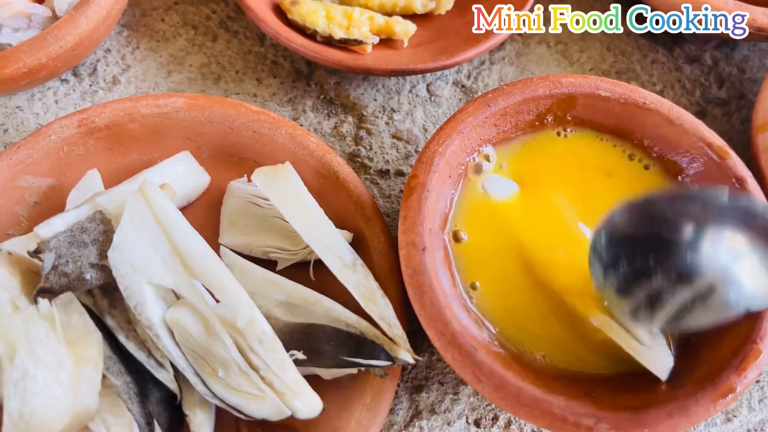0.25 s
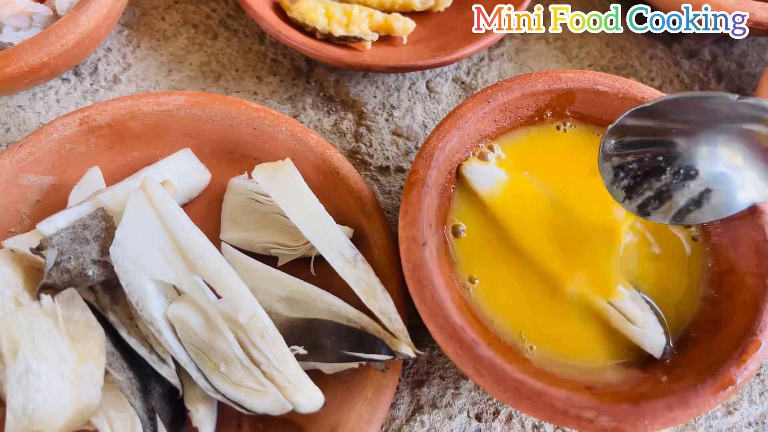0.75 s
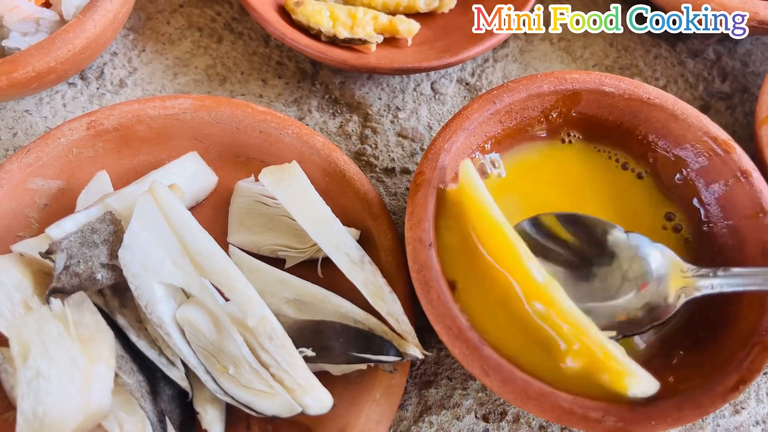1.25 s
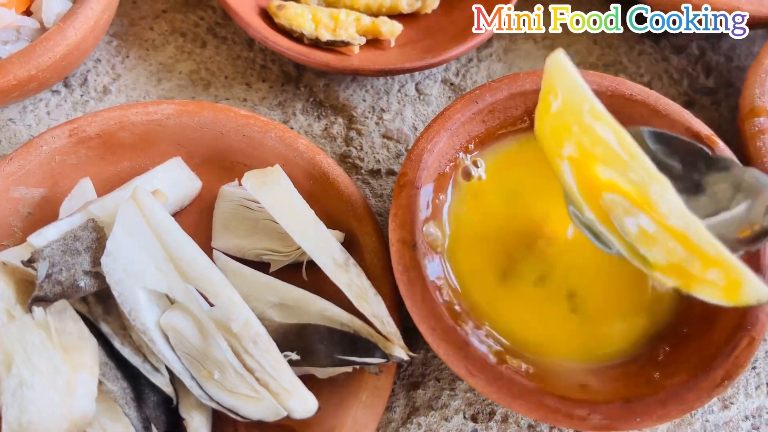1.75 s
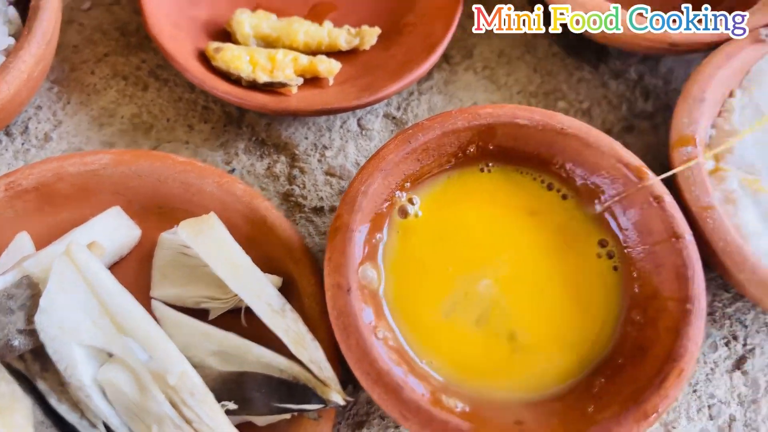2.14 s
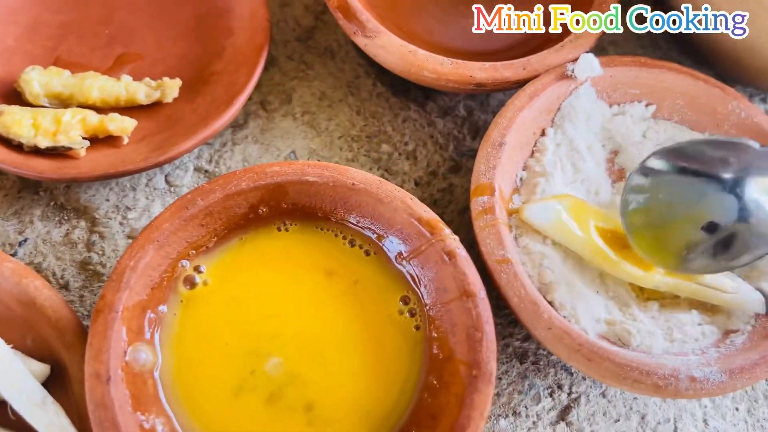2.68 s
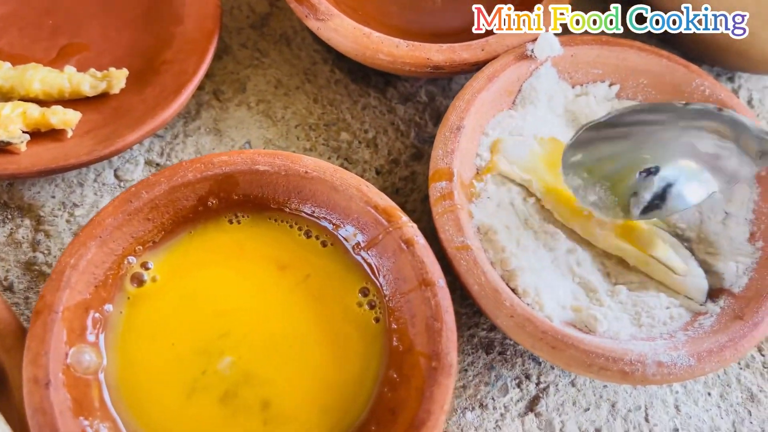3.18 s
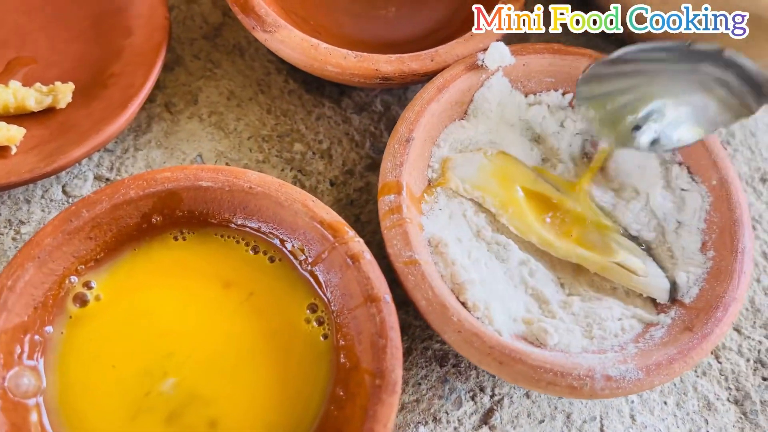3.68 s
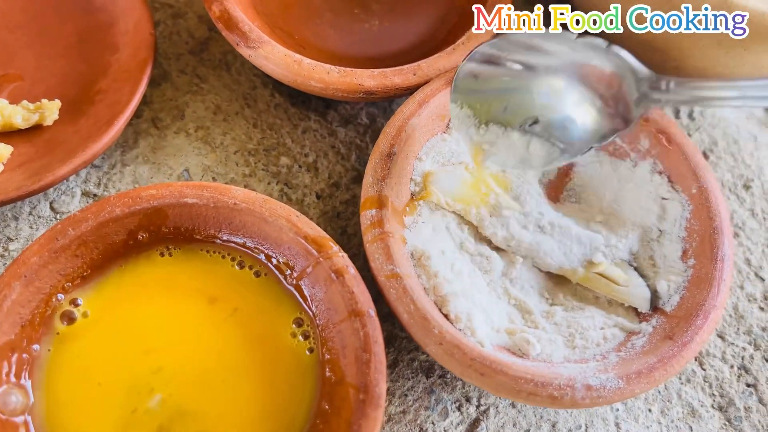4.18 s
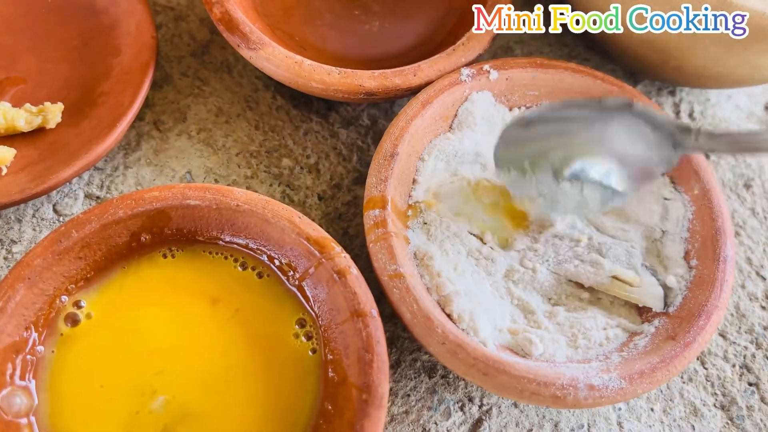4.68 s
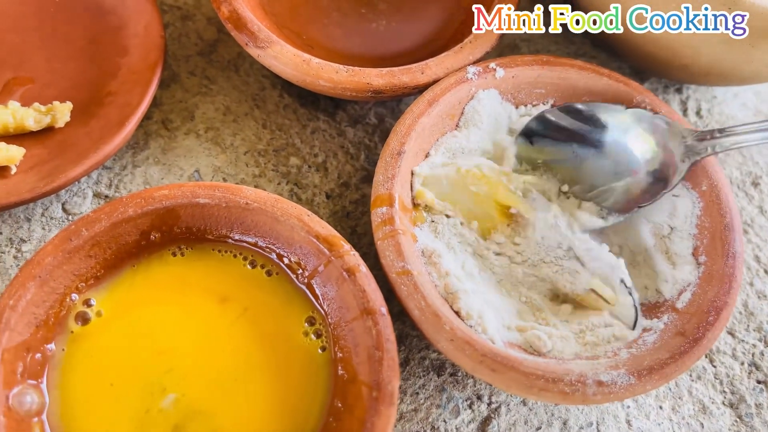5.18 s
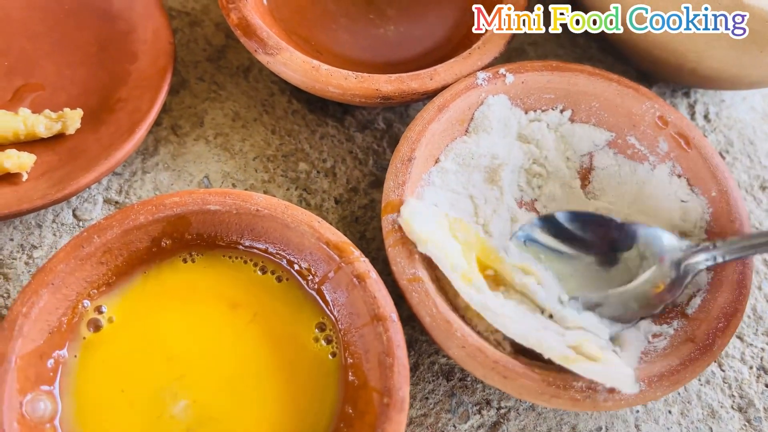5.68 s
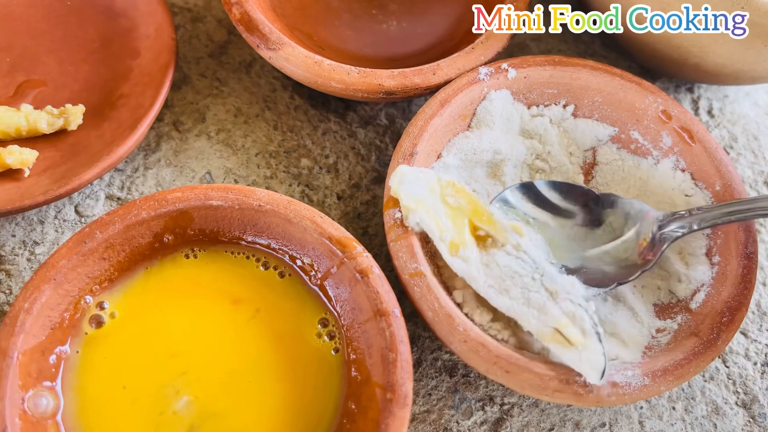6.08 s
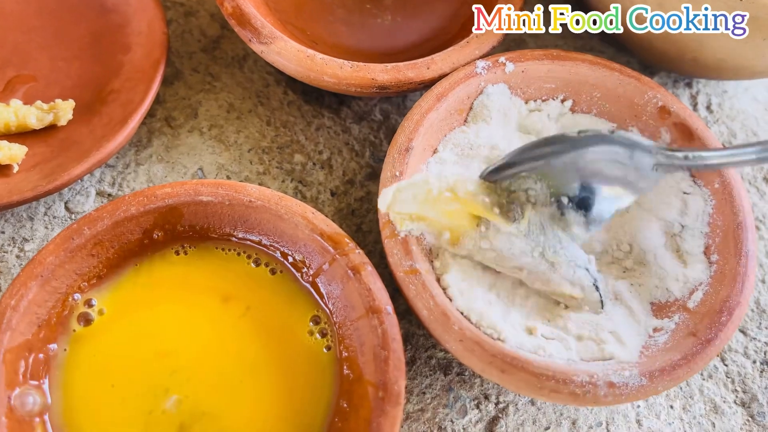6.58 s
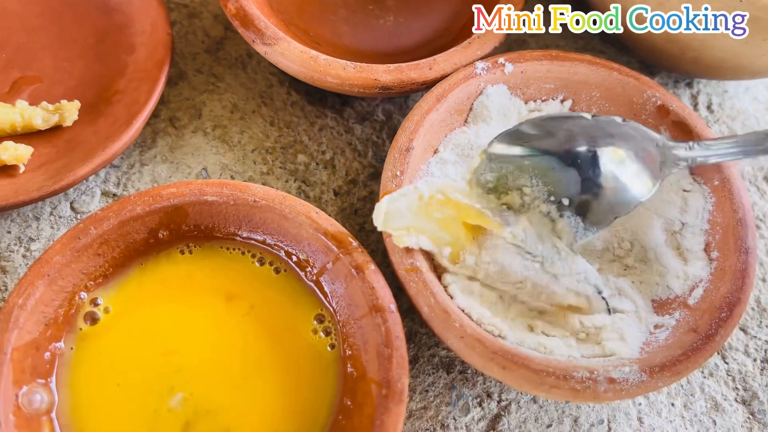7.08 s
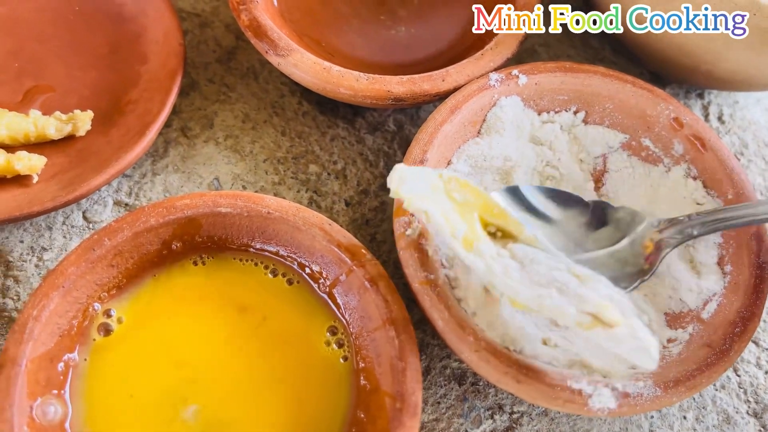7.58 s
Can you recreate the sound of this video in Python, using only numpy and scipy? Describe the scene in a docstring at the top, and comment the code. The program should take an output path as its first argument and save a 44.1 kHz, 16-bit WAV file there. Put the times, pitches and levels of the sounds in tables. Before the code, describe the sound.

Many songbirds whistle, trill and chirp at once in a reverberant wood, over a shimmering distant chorus and a few faint hoarse croaks.

```python
"""Whistle glides, trills and repeated syllables ring out from songbirds on the left, ahead and on the right:
a dawn chorus in a wood. Each whistle is a sine that follows a pitch line and a level line.
Trunks and leaves smear every note into a dense tail, made with decaying noise.
Behind lie far birds (many random short whistles), a few hoarse low calls (throat pulses and breath noise
through a resonance) and a faint air of leaves (smooth noise). Little passes below 1 kHz or above 9 kHz."""
import sys
import numpy as np
from scipy import signal
from scipy.fft import rfft, irfft
from scipy.io import wavfile
from scipy.ndimage import uniform_filter1d

SR = 44100
rng = np.random.default_rng(int(sys.argv[2]) if len(sys.argv) > 2 else 0)


def boost(x):
    """Linear amplitude factor 10**(x/20) for a level x in decibels (scalar or array-like)."""
    u = np.asarray(x, float) / 20
    return 10 ** u


def wav_record(signal):
    """Record a signal, one row per channel, as 16-bit PCM in the file named by sys.argv[1]."""
    frames = np.transpose(np.atleast_2d(signal))
    bounded = np.clip(frames, -1, 1)
    # unit amplitude maps onto the largest positive 16-bit level
    quanta = np.round(bounded * 32767).astype(np.int16)
    wavfile.write(sys.argv[1], SR, quanta)


N = 345744  # length in samples

# In the bird tables, levels are those of the dry notes, before the wood; pan/dB is left minus right.

# the wood as heard from the left, ahead, the right and close by; columns: whole tail level/dB,
# time the lower tail takes to fall 60 dB t/s, likeness of left and right (0-1),
# close reflections against the late tail level/dB, echo against the close reflections level/dB
WOOD_PLACES = [(4, 0.94, 0.2, 4.5, -6), (0, 0.93, .4, 6, -4), (-4.5, 0.99, 0.3, 4.5, -12),
               (-3, 1, .4, 4, -8.5)]


def near_birds():
    """All near singers, each group scattered by the part of the wood around it."""
    return sum(wood(dry_notes, *place) for dry_notes, place in zip(songbirds(), WOOD_PLACES))


def songbirds():
    """All near singers, dry, sorted by place: left, ahead, right, close by."""
    places = np.zeros((len(WOOD_PLACES), 2, N))
    flutter_hz = 45 * unsteady(42.)  # slight wavering shared by all near notes except the held ones
    sing_syllables(places, flutter_hz)
    sing_bends(places, flutter_hz)
    sing_hooks(places, flutter_hz)
    sing_slides(places, flutter_hz)
    sing_arches(places, flutter_hz)
    sing_chatter(places)
    return places


# strokes of repeated syllables, some rows sound together as one syllable; columns: pan/dB, shape, phrases
# shape rows: t/s after the start, f/Hz, level/dB; each phrase holds the settings of phrase()
SYLLABLE_STROKES = [(-1, [(0.0, 3350, -50.5), (0.02, 4207, -35.5), (0.035, 5660, -45.5)],
                    [dict(first_s=.438, gap_s=.09, db=0.25, step_db=0, count=4)]), (8, [(0.0, 5290, -64.5),
                    (0.012, 8560, -53.5), (0.07, 8010, -41.5), (0.12, 8260, -62)],
                    [dict(first_s=.559, gap_s=.151, db=-6.5, step_db=-1, count=2),
                    dict(first_s=7.525, db=-1)]), (5.5, [(0.0, 6805, -47), (0.026, 5786, -44),
                    (0.058, 4490, -45)], [dict(first_s=.868, gap_s=.153, db=3, step_db=-0.26, count=4),
                    dict(first_s=7.703, db=2.1)]), (9.5, [(0.0, 5156, -55.5), (0.015, 7740, -53),
                    (0.04, 7790, -63.5)], [dict(first_s=.851, gap_s=.154, db=-0.5, step_db=-2, count=4),
                    dict(first_s=7.676, db=3.5)]), (-13.5, [(0, 4550, -58), (0.012, 6350, -50),
                    (0.026, 6960, -54.5)], [dict(first_s=2.727, gap_s=.184, db=-0.5, step_db=3, count=2)]),
                    (-9.5, [(0.0, 4720, -57.5), (0.02, 6330, -47), (0.09, 5364, -49.5), (0.13, 5415, -53)],
                    [dict(first_s=2.732, gap_s=.184, count=2)]), (-2, [(0.0, 7410, -42), (0.026, 5112, -30),
                    (0.065, 6080, -36.5)], [dict(first_s=5.05, gap_s=.347, db=0.5, step_db=.9, count=2),
                    dict(first_s=5.219, gap_s=.349, db=-3, step_db=4.5, shift_hz=-150, count=2)]),
                    (-1, [(0.0, 6670, -48), (.012, 7370, -44), (0.03, 7995, -48)],
                    [dict(first_s=5.116, gap_s=.17, db=-0.3, step_db=-.3, count=3)]),
                    (-2.2, [(0.0, 5610, -55.5), (.006, 7150, -50), (0.025, 7250, -49.5)],
                    [dict(first_s=5.022, gap_s=.172, db=0.3, step_db=0, count=4)]), (3.3, [(0.0, 5600, -68),
                    (.02, 5884, -60.5), (.09, 5240, -61), (.14, 5090, -59)],
                    [dict(first_s=3.3, gap_s=.228, step_db=-1.7, count=2)]), (-1.5, [(0.0, 5386, -47.5),
                    (.009, 4490, -34), (0.019, 3550, -40)],
                    [dict(first_s=5.966, gap_s=.0584, db=-1.5, step_db=0.12, count=10)])]
# row numbers of the strokes sung close by (no unit)
CLOSE_STROKES = (0, 10)


def sing_syllables(places, flutter_hz):
    """Repeats each whistled stroke at an even pace within a phrase, shifted in pitch and level."""
    for row, (pan_db, shape, phrases) in enumerate(SYLLABLE_STROKES):
        for settings in phrases:
            for repeat in phrase(**settings):
                notes = np.array(shape) + repeat
                add_whistle(places, pan_db, notes, flutter_hz, close=row in CLOSE_STROKES)


def phrase(first_s, gap_s=0, db=0, step_db=0, shift_hz=0, count=1):
    """Start, pitch shift and level shift of each repeat; gap_s runs from start to start."""
    return [(first_s + k * gap_s, shift_hz, db + k * step_db) for k in range(count)]


# bent notes; columns: start t/s, bend after the start t/s, length t/s,
# first f/Hz, bend f/Hz, last f/Hz, level at the bend/dB, pan/dB
BENT_NOTES = [(.03, .04, .115, 5950, 5480, 5150, -29, 1), (4.906, .02, .066, 4330, 4680, 3850, -29.5, -1),
              (3.303, .02, 0.055, 3780, 4370, 3780, -49, 9), (2.8, .24, .36, 8050, 7980, 6950, -72.5, 3.5),
              (3.17, .05, .2, 3330, 3640, 3440, -45.5, 4), (1.325, .04, .1, 3380, 3030, 2840, -51.5, -10.5),
              (3.955, .06, .19, 5800, 5150, 5250, -45, -3), (6.8, .04, .16, 5500, 5150, 5080, -58.5, 2),
              (7.02, .05, 0.18, 5940, 5120, 5050, -59.5, 6.5),
              (.35, 0.012, 0.11, 4970, 6476, 6200, -42, -0.2),
              (1.281, 0.022, 0.054, 2980, 4280, 3204, -42.5, -10),
              (2.349, 0.016, 0.033, 6820, 2490, 7000, -53, -8.5),
              (2.429, 0.0059, 0.015, 7790, 6470, 6900, -42.5, -9.5),
              (2.595, 0.013, 0.025, 3690, 7500, 7850, -53.5, -17),
              (2.649, .006, 0.019, 7100, 7000, 6260, -48.5, -12),
              (2.745, 0.0079, 0.051, 2860, 2840, 2187, -52, 9),
              (4.19, 0.035, .07, 6410, 5360, 3555, -39, -1.5),
              (4.222, .14, 0.21, 7910, 8085, 7900, -50.5, 1), (4.405, .04, .11, 5500, 6000, 6300, -33, -2),
              (4.74, .035, .12, 6010, 7305, 7690, -40.5, 0.5),
              (7.265, .14, .27, 4150, 4120, 4460, -47.5, 4.5),
              (7.27, 0.17, 0.22, 8560, 7850, 8000, -47.5, 7.5)]


def sing_bends(places, flutter_hz):
    """Pitch runs to a bend and turns; the note is 11 dB softer at both ends than at the bend."""
    for s, bend, length, first_hz, bend_hz, last_hz, db, pan_db in BENT_NOTES:
        rows = [(s, first_hz, db - 11), (s + bend, bend_hz, db), (s + length, last_hz, db - 11)]
        add_whistle(places, pan_db, rows, flutter_hz)


# hooked notes; columns: start t/s, length t/s, top f/Hz, level before swell and fade/dB, pan/dB
HOOKED_NOTES = [(5.863, 0.056, 7026, -47, 0.5), (6.56, .18, 6893, -32.5, -0.2),
                (6.986, 0.057, 6050, -62.5, 3)]


def sing_hooks(places, flutter_hz):
    """Whistles that flick up briefly, then drop and settle."""
    for *note, pan_db in HOOKED_NOTES:
        add_whistle(places, pan_db, hook(*note), flutter_hz)


def hook(start, length, top_hz, db):
    """A flick up to the top, a drop that settles; the level swells while it fades."""
    t, flick_s = np.linspace(0, length, 40), .011
    # flick and drop are shares of the top pitch
    flick = .07 * np.clip(1 - t / flick_s, 0, 1)
    drop = .16 * (1 - np.exp(-np.maximum(t - flick_s, 0) / (.45 * length)))
    swell_db = 12 * np.clip(1 - t / (0.11 * length), 0, 1)
    fade_db = 62.5 * t
    return np.transpose([start + t, top_hz * (1 - flick - drop), db - swell_db - fade_db])


# long thin whistles; columns: start t/s, length t/s, first f/Hz, level at the strongest pitch/dB, pan/dB
SINKING_WHISTLES = [(-.2, 0.47, 9080, -56, -4), (1.619, 0.68, 9240, -66.5, 8.5),
                    (3.7, 0.34, 8630, -57.5, -5), (6.633, 0.32, 8480, -58.5, -5.5),
                    (6.919, 0.49, 9260, -64.5, 9)]


def sing_slides(places, flutter_hz):
    """Long whistles that sink towards one shared pitch."""
    for *note, pan_db in SINKING_WHISTLES:
        add_whistle(places, pan_db, slide(*note), flutter_hz)


def slide(start, length, first_hz, db):
    """Pitch sinks ever more slowly; the voice is strongest around one pitch."""
    goal_hz, sink_s, strongest_hz, loss_db_per_khz = 7250, .3, 7850, 17
    t = np.linspace(0, length, 12)
    hz = goal_hz + (first_hz - goal_hz) * np.exp(-t / sink_s)
    loss_db = loss_db_per_khz * np.abs(hz - strongest_hz) / 1000
    return np.transpose([start + t, hz, db - loss_db])


# arched notes of one bird; columns: start t/s, length t/s, foot f/Hz, top f/Hz,
# level at the top/dB, warble depth f/Hz
ARCHED_NOTES = [(-.12, 0.19, 2410, 2952, -49, 250), (0.943, .175, 2145, 3346, -53.5, 30.1),
                (4.43, .27, 2400, 2900, -62, 60), (5.46, .26, 2073, 2742, -55, 119.4),
                (5.863, .2, 2416, 3280, -47.5, 355), (6.223, 0.19, 2414, 3298, -48, 354.5)]


def sing_arches(places, flutter_hz):
    """One bird on the right; a fast warble swings the pitch of its arched notes."""
    for *note, warble_hz in ARCHED_NOTES:
        add_whistle(places, -12.5, arch(*note), flutter_hz, warble_hz)


def arch(start, length, foot_hz, top_hz, db):
    """Pitch and level rise and fall together."""
    u = np.linspace(0, 1, 15)
    height = np.abs(np.sin(np.pi * u)) ** 0.99
    hz = foot_hz + (top_hz - foot_hz) * height
    return np.transpose([start + u * length, hz, db - 5.5 * (1 - height)])


# held notes, from clear to chattered; columns: start t/s, length t/s, f/Hz,
# level at the start/dB, pan/dB, typical pitch waver f/Hz
HELD_NOTES = [(0.0, 0.066, 7150, -44.5, 0.3, 30), (0.047, 0.25, 4295, -52.5, -0.5, 90),
              (0.177, 0.076, 2446, -49.5, -10, 150), (0.482, 0.19, 6910, -63, 7.5, 30),
              (0.701, 0.095, 2676, -50, 3, 171), (1.45, .3, 3524, -54, 2.5, 149.3),
              (1.86, .22, 3720, -62.5, 0, 30.16), (1.671, .05, 2740, -61, -2.5, 40),
              (1.734, .2, 3103, -58.5, -7, 40), (2.273, 0.14, 6880, -63, 10.5, 30.2),
              (2.347, 0.23, 2982, -56, 2, 50.2), (3.03, .12, 3555, -51.5, 9, 139.5),
              (3.116, .1, 2750, -61, 0.5, 25.1), (3.36, .2, 4000, -57, 7, 200),
              (3.728, 0.24, 4410, -61.5, 4, 40.4), (3.863, .2, 4110, -53, 2, 30.1),
              (3.986, 0.099, 4826, -53, 7.5, 24.8), (4.105, 0.11, 6810, -59, 4.5, 50),
              (4.328, 0.38, 8800, -64.5, 3.5, 39.8), (4.679, 0.29, 3496, -48.5, 3, 60),
              (4.529, .1, 3720, -58.5, 1.5, 40), (4.675, 0.14, 4200, -49.5, 3.5, 121),
              (4.716, 0.11, 2963, -56, 3, 109), (4.757, 0.076, 6660, -45, -2, 29.6),
              (4.956, .07, 5090, -53.5, -1, 260), (5.42, 0.077, 3158, -54.5, 4.5, 25.1),
              (5.679, 0.11, 4256, -55.5, 5, 24.7), (6.64, 0.091, 4253, -52.5, 2, 30.6),
              (6.83, .15, 3698, -54, -3, 39.7), (6.86, .11, 3430, -55, -2.5, 59.8),
              (6.999, 0.14, 2370, -67, -1.5, 60), (7.015, 0.26, 4553, -59, 9.5, 30.1),
              (6.99, .17, 2961, -60, -0.5, 25), (7.055, 0.21, 4230, -53.5, 1, 35.1),
              (7.416, 0.15, 2940, -60, -0.5, 30.1), (7.74, .1, 2930, -60.5, 0, 40),
              (7.581, 0.16, 2392, -65, -4, 30)]


def sing_chatter(places):
    """Held notes whose pitch shakes at random: the wider the waver, the rougher the note."""
    rasp = unsteady(130.)
    for s, length, hz, db, pan_db, waver_hz in HELD_NOTES:
        rows = [(s, hz, db), (s + length, hz, db - 5.5)]
        add_whistle(places, pan_db, rows, waver_hz * rasp, fade_s=0.0073)


# pan limits between left and ahead, and between ahead and right; columns: pan/dB, pan/dB
AHEAD_LIMITS = (3.2, -6.5)


def add_whistle(places, pan_db, rows, flutter_hz, warble_hz=0., close=False, fade_s=0.0022, bend_s=0.011):
    """One whistle: a sine that follows its rounded pitch and its level, put where the bird sits."""
    s, hz, db = np.transpose(rows)
    at = np.arange(max(int(s[0] * SR), 0), min(int(s[-1] * SR), N))
    t = at / SR
    # a short running average rounds the corners of the pitch line
    rounding = int(min(bend_s, (s[-1] - s[0]) / 4) * SR) + 1
    pitch = uniform_filter1d(np.interp(t, s, hz), rounding, mode="nearest")
    pitch += flutter_hz[at] + warble_hz * np.sin(2 * np.pi * 63 * (t - s[0]))  # warble at 63 Hz
    phase = 2 * np.pi * np.cumsum(pitch) / SR
    tone = np.sin(phase) + boost(-45) * np.sin(2 * phase)  # with a faint second partial
    edges = np.clip(np.minimum(t - s[0], s[-1] - t) / fade_s, 0, 1)
    loudness = boost(np.interp(t, s, db)) * np.sin(edges * np.pi / 2) ** 2 * np.sqrt(2)
    sides = boost(np.array([[pan_db], [-pan_db]]) / 2)
    place = int(pan_db < AHEAD_LIMITS[0]) + int(pan_db < AHEAD_LIMITS[1])
    if close:
        place = -1
    places[place][:, at] += loudness * tone * sides


def unsteady(rate_hz):
    """Random wavering of spread 1: noise through a double one-pole low-pass."""
    r = np.exp(-2 * np.pi * rate_hz / SR)
    return rms_one(signal.lfilter([1], [1, -2 * r, r * r], rng.standard_normal(N)))


def rms_one(x):
    """Scales to unit rms."""
    return x / np.sqrt(np.mean(x ** 2) + 1e-20)


def wood(x, tail_db, t60, alike, early_db, echo_db, echo_s=0.094, early_t60=0.18, treble_loss=1.3):
    """Scattering by trunks and leaves: a burst of close reflections, a long tail that loses its treble first,
    and the close scatter once more, sides swapped, from the edge of the clearing."""
    t = np.arange(int(1.5 * SR)) / SR
    shared, own = rng.standard_normal((2, 2, len(t)))
    alike = np.clip(alike, 0, 1)
    noise = np.sqrt(alike) * shared[0] + np.sqrt(1 - alike) * own
    low = signal.sosfilt(signal.butter(2, 4500., fs=SR, output="sos"), noise)
    high = noise - low
    late = low * boost(-60 * t / t60) + high * boost(-60 * t / t60 * (0.5 + treble_loss))
    early = noise * boost(early_db - 60 * t / early_t60)
    tail, lag = late + early, int(echo_s * SR)
    tail[:, lag:] += boost(echo_db) * early[::-1, :-lag]
    tail = boost(tail_db) * tail / np.sqrt(np.mean(np.sum(tail ** 2, 1)))
    tail[:, 0] += boost(-3.5)  # the direct sound
    return signal.fftconvolve(x, tail, axes=1)[:, :N]


def far_layers():
    """Far birds and hoarse calls, mostly heard as tail."""
    scattered = wood(far_birds() + croaks(), tail_db=7.16, t60=0.99, alike=0.22, early_db=2.3, echo_db=-20)
    return boost(-8.5) * scattered


# rise and fall of the far birds, before far_layers() scatters and lowers them; columns: t/s, level/dB
FAR_LEVEL = [(0.0, -55), (1.2, -57.5), (2.15, -67), (3.84, -65.5), (5.0, -56.5), (6.05, -54.5),
             (7.84, -64.5)]


def far_birds(count=700):
    """Many short fluttering whistles at random times and places, most of them at middle pitches."""
    places, flutter_hz = np.zeros((3, 2, N)), 60 * unsteady(30.)
    for when, long, high, higher, glide, loud, where in rng.random((count, 7)):
        s, length = when * N / SR, .03 + .15 * long ** 2
        hz = 2350 * 1.48 ** (high + higher)  # the sum of two draws favours the middle
        db = -9 * loud
        rows = [(s, hz, db), (s + length, hz * (.88 + .18 * glide), db - 3.5)]
        add_whistle(places, 14 * (where - .5), rows, flutter_hz, fade_s=0.014)
    s, db = np.transpose(FAR_LEVEL)
    return rms_one(places.sum(0)) * boost(np.interp(np.arange(N) / SR, s, db))


# hoarse low calls, before far_layers() scatters and lowers them;
# columns: start t/s, length t/s, throat resonance f/Hz, level/dB
HOARSE_CALLS = [(0.592, 0.26, 1532, -71), (1.435, 0.25, 1514, -77), (3.664, 0.58, 1727, -74),
                (4.442, .3, 1495, -70.5), (7.581, 0.15, 1945, -71.5)]


def croaks(pulse_hz=76.6, width=0.12, rough=0.83):
    """Uneven throat pulses mixed with breath noise, through one broad resonance."""
    out, t = np.zeros((2, N)), np.arange(N) / SR
    beat = np.cumsum(pulse_hz * (1 + .3 * rng.standard_normal(N))) / SR
    # one pulse each time the beat count passes a whole number
    pulses = (np.diff(np.floor(beat), prepend=0) != 0) * np.sqrt(SR / pulse_hz)
    source = pulses + rough * rng.standard_normal((2, N))
    for s, length, hz, db in HOARSE_CALLS:
        throat = signal.butter(2, [hz * (1 - width), hz * (1 + width)], "band", fs=SR, output="sos")
        swell = np.sin(np.pi * np.clip((t - s) / length, 0, 1)) ** 0.25
        out += boost(db) * swell * rms_one(signal.sosfilt(throat, source))
    return out


# colour of the air and leaves, only the shape counts; columns: f/Hz, level/dB per Hz
AIR_COLOUR = [(1000, -26), (1350, -11.5), (2000, -8.5), (3500, -1.5), (7000, -11.5), (9200, -27.5)]


def air(alike=0.69):
    """Air and leaves: steady smooth noise, shaped in its spectrum and partly alike on both sides."""
    hz = np.maximum(np.fft.rfftfreq(N, 1 / SR), 1)
    colour = boost(in_log_hz(AIR_COLOUR, hz))
    mid, side = irfft(rfft(rng.standard_normal((2, N))) * colour, N)
    width = np.sqrt(np.clip(1 - alike, 0, 1))
    return boost(-71.5) * rms_one(mid + width * side * [[1], [-1]])


def in_log_hz(points, hz):
    """A spectrum read on a log-frequency axis."""
    point_hz, point_db = np.array(points)[:, 0], np.array(points)[:, 1]
    return np.interp(np.log(hz), np.log(point_hz), point_db)


def scene():
    """Near birds in front, far birds and hoarse calls behind, and the air of leaves."""
    return near_birds() + far_layers() + air()


def roll_off(x):
    """The treble ends steeply here."""
    return signal.sosfilt(signal.butter(12, 9080, fs=SR, output="sos"), x)


def record(dry):
    """The microphone: steep low and high cuts and a trace of hiss, stronger on the right."""
    band = signal.sosfilt(signal.butter(8, [1100, 9300], "band", fs=SR, output="sos"), dry)
    hiss = boost(-99) * rng.standard_normal(dry.shape) * boost([[-3.5], [3.5]])
    return roll_off(band + hiss)


dry = scene()
out = record(dry)
wav_record(out)
```